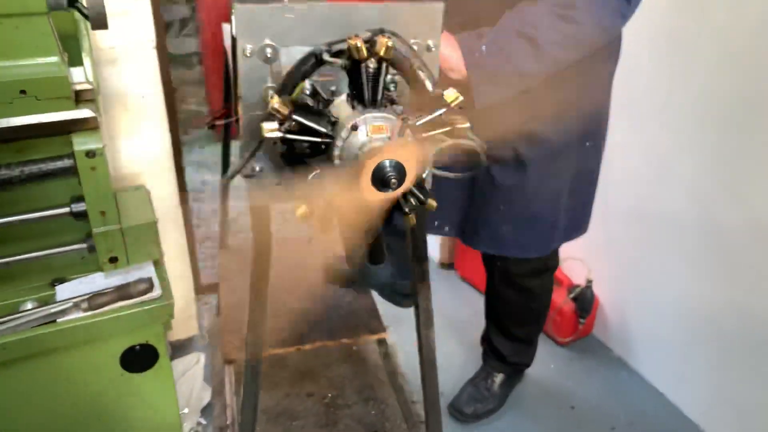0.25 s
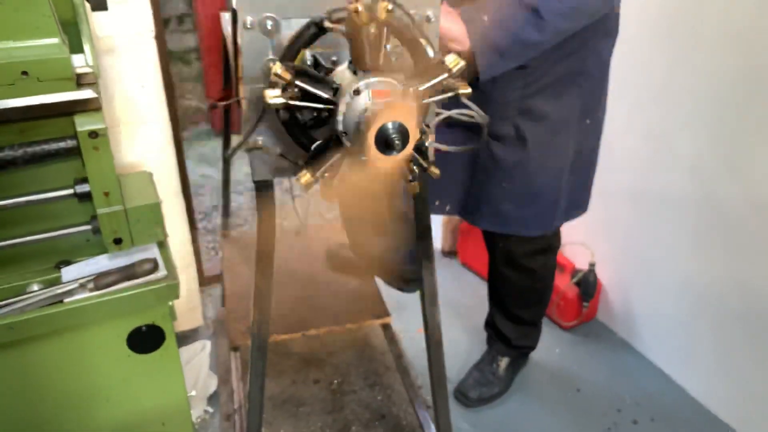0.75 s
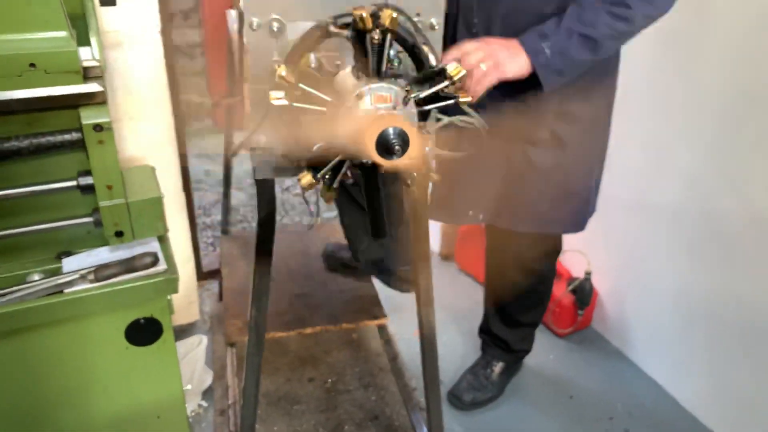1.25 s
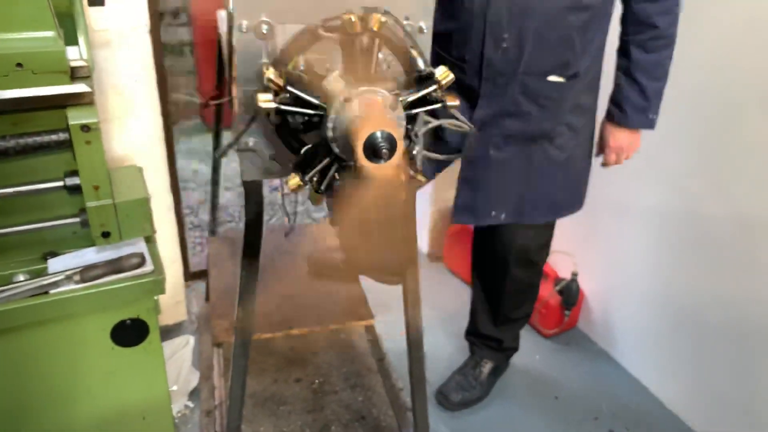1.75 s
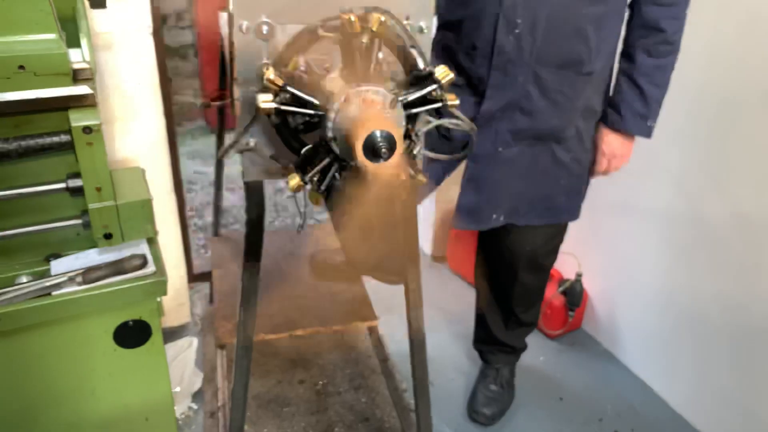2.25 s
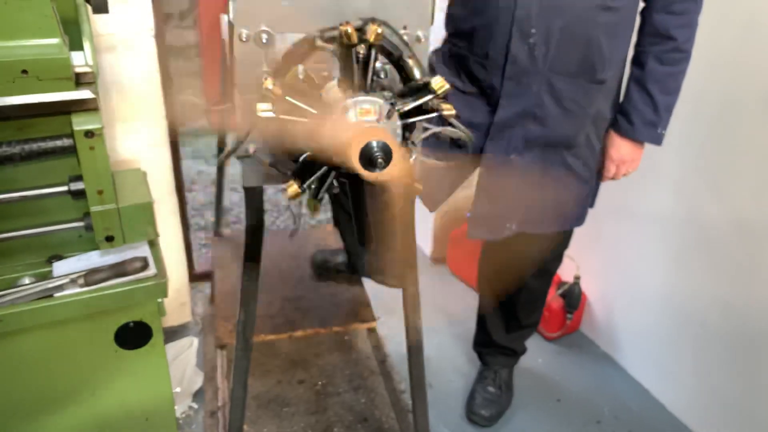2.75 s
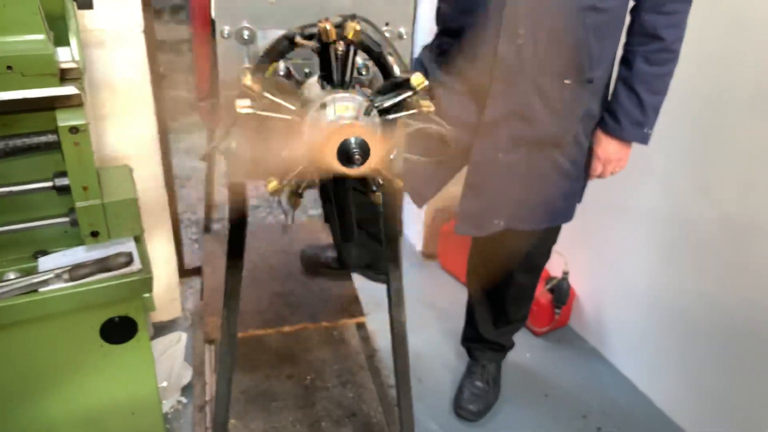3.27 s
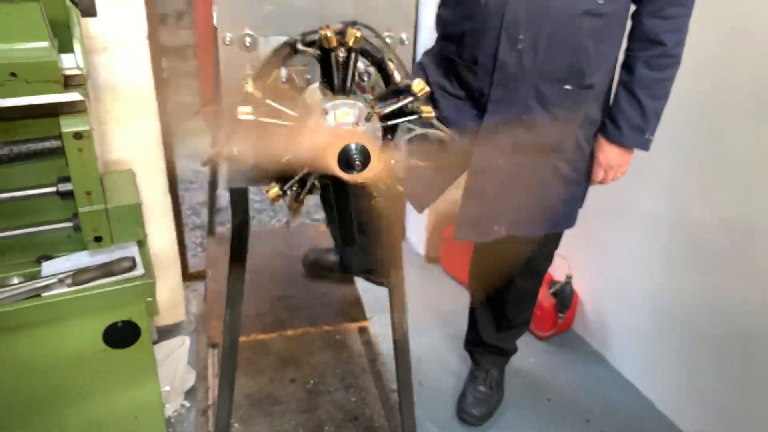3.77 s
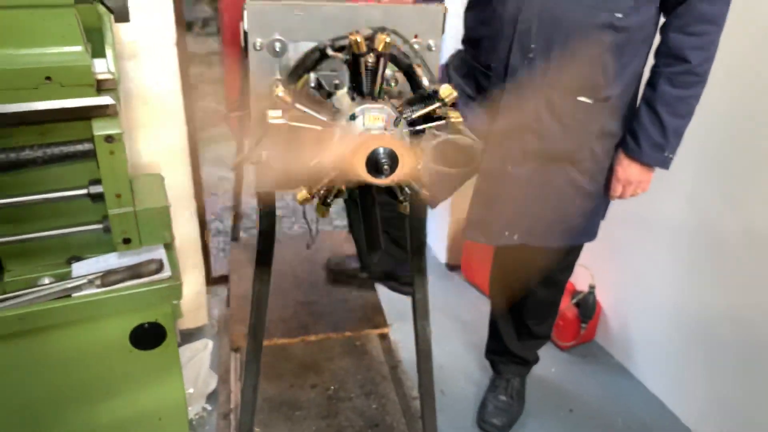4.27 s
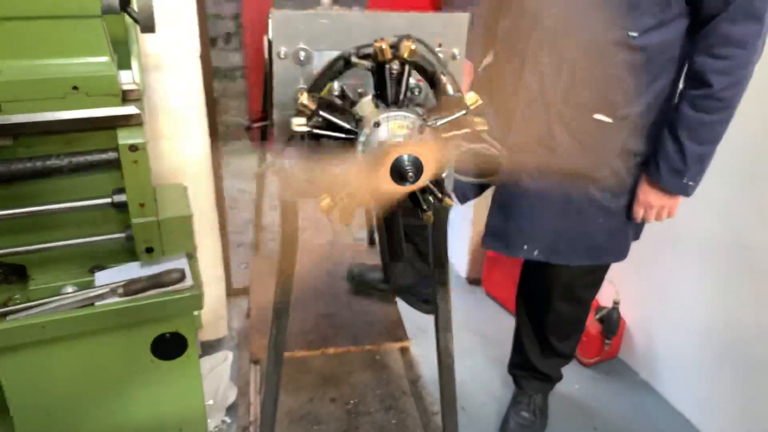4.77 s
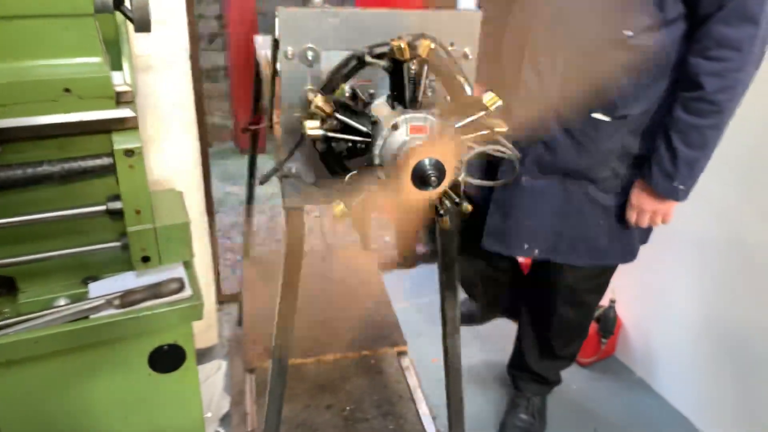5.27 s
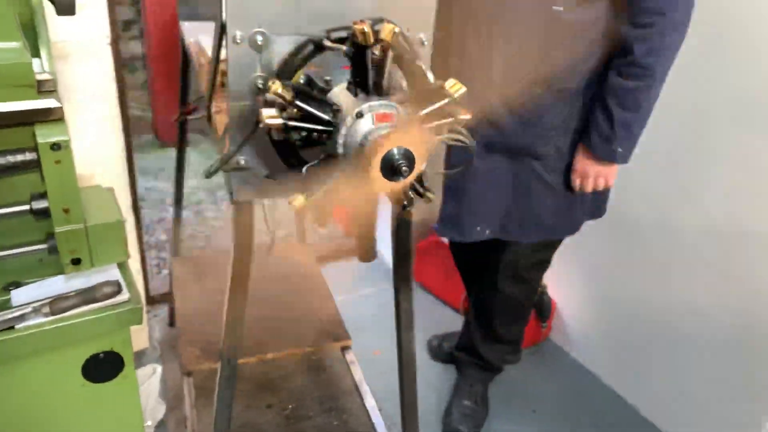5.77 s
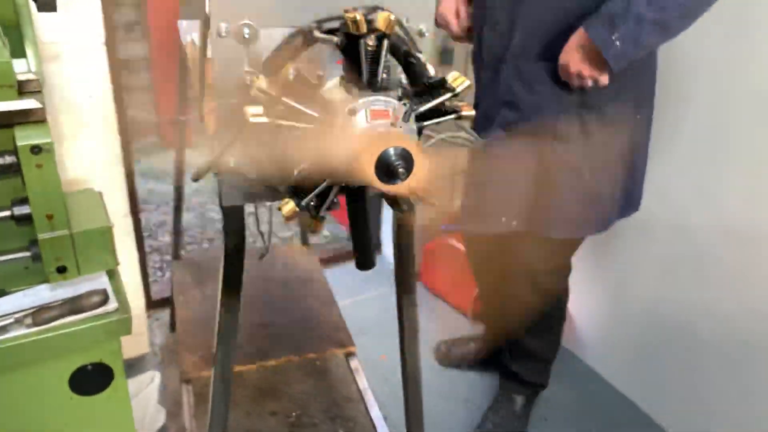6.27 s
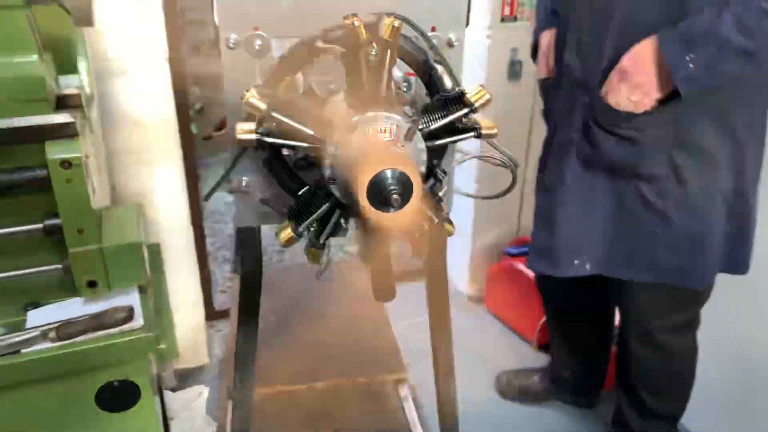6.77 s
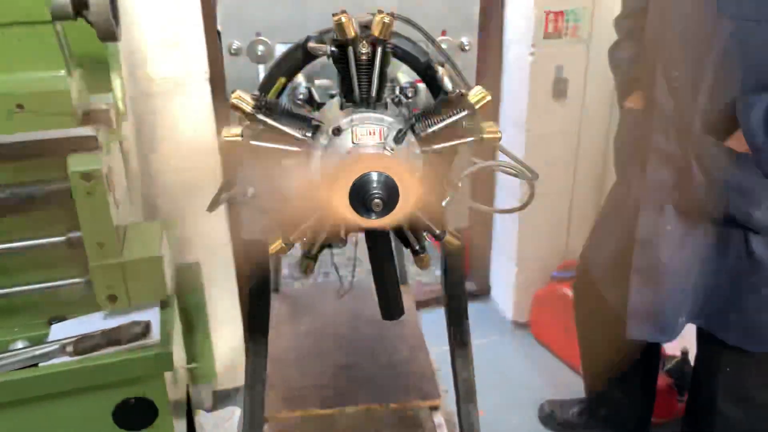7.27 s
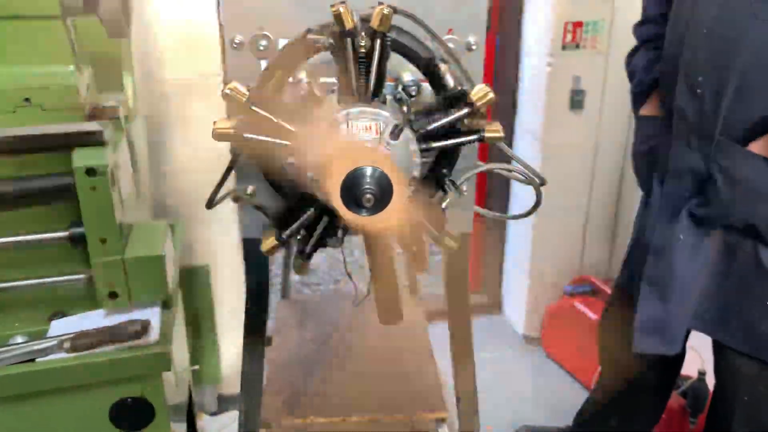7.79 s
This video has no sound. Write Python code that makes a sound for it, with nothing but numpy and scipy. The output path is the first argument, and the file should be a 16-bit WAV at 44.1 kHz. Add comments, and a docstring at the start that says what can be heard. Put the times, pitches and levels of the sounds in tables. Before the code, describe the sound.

A small radial petrol engine is already idling at 0 seconds and keeps running to the end at about 8 seconds, turning a wooden propeller on a workshop stand about a metre from the microphone. The main sound is a rapid, deep exhaust thumping, roughly thirty beats a second, bunched into uneven clusters by frequent missed firings. Each thump comes with a short, ringing metallic knock and a spit of hiss from the pipe. The tiny gaps are filled by valve gear clatter and fluttering propeller wash, with a low throb underneath and sharp, bright ticks scattered throughout. Around 3.3 to 3.7 seconds the engine briefly quickens a little and the low throb swells, then it settles back into the same lumpy idle. The loudness stays about even overall, and the room adds short reflections and a low hum.

```python
"""An uneven, thumping idle: a small radial engine on a workshop stand, a metre from a two-port microphone.
Each cylinder that fires thumps the exhaust pipe, rings the metal and spits hiss from the pipe mouth.
Missed firings leave gaps filled by valve gear clatter and propeller wash.
Blade passes and piston strokes add a low throb."""
import sys
import numpy as np
from scipy import signal
from scipy.fft import rfft, irfft
from scipy.io import wavfile
from scipy.ndimage import uniform_filter1d

SR = 44100
rng = np.random.default_rng(int(sys.argv[2]) if len(sys.argv) > 2 else 0)


def dump_mix(stems):
    """Bounce the given channels to the path in sys.argv[1] as a 16-bit WAV at rate SR."""
    frames = np.atleast_2d(stems).T  # one column per channel
    limited = np.clip(frames, -1, 1)  # hard clip at full scale
    pcm = np.round(limited * 32767).astype(np.int16)
    wavfile.write(sys.argv[1], SR, pcm)


N = 354123

# firings: t/s, thump level/dB, knock level/dB, hiss level/dB
FIRINGS = [(0, -7, -26, -34), (0.0279, -10, -28, -23.5), (0.066, -16, -21.5, -32), (0.0856, -9, -27, -20),
           (0.1043, -7.5, -21.5, -21.5), (0.1584, -12.5, -28, -23.2), (0.1777, -6.5, -27, -28),
           (0.2143, -8, -26.5, -30), (0.2723, -8.5, -25, -20), (0.3106, -10, -28.5, -44),
           (0.3493, -14, -21.5, -19), (0.3678, -7.5, -25.7, -22), (0.3877, -12, -23, -25),
           (0.405, -8.5, -30, -33), (0.4616, -6, -23, -19.5), (0.497, -8.5, -26, -32.9),
           (0.5356, -12.5, -25, -21), (0.5562, -11.5, -26.5, -26.5), (0.595, -10.5, -24.5, -30.1),
           (0.6349, -11, -22.5, -20), (0.6555, -7.5, -26, -24), (0.6743, -8, -21.2, -30),
           (0.6966, -13.5, -32, -35), (0.7511, -8.5, -20.5, -19.5), (0.791, -10.5, -29, -25),
           (0.829, -14, -17.5, -19), (0.849, -9, -31, -24), (0.8854, -14.5, -32, -41),
           (0.9465, -8.5, -21.5, -19.5), (0.9657, -7, -19, -22), (0.991, -9, -32, -42),
           (1.0218, -21, -23, -23), (1.0402, -7, -25.5, -23), (1.078, -17, -28, -45),
           (1.1176, -14, -39, -42), (1.1378, -11, -24.5, -19.5), (1.178, -9.5, -24, -36),
           (1.2173, -11, -20.5, -19.9), (1.2382, -9, -21, -20), (1.2563, -8.5, -23, -24),
           (1.2753, -8.5, -37, -33), (1.33, -10.5, -23, -19.5), (1.37, -11.5, -37, -41),
           (1.4093, -12, -18, -20.5), (1.4292, -10, -26.5, -26), (1.4688, -8.3, -30, -35),
           (1.5331, -9.5, -23, -20), (1.5522, -8, -25, -29), (1.5712, -7, -28, -37), (1.611, -13, -21, -19),
           (1.6306, -9.5, -27.4, -22.5), (1.6687, -14, -26, -39), (1.7304, -8.5, -22, -20),
           (1.772, -10, -32, -51), (1.8154, -15, -23.5, -22), (1.8373, -10, -30, -26.9),
           (1.8575, -10, -20, -23), (1.8767, -8, -33, -43), (1.9188, -12, -19, -27), (1.9395, -8, -28, -25),
           (1.9793, -7.5, -23, -28.8), (2.021, -15.5, -24, -40), (2.0427, -9.5, -23.5, -21),
           (2.0833, -13, -27, -48), (2.1248, -17, -21.5, -19), (2.1457, -8, -24, -24),
           (2.1658, -14, -26, -22), (2.1843, -7, -22, -41), (2.242, -9.5, -20.5, -23.9),
           (2.2824, -14, -33.9, -44), (2.3247, -16, -17.5, -23.5), (2.3464, -12, -27, -27),
           (2.3871, -8.5, -24, -41), (2.4514, -10, -21, -18.5), (2.4715, -9.5, -20.5, -26),
           (2.4912, -13, -33, -49), (2.5313, -12.5, -27, -17), (2.5512, -7.5, -29, -20),
           (2.5909, -12, -27, -28.8), (2.6512, -9, -25, -26.4), (2.671, -15, -26.5, -38),
           (2.691, -10, -29, -43), (2.7332, -17, -21, -21), (2.7551, -11, -23, -22),
           (2.7749, -12, -23, -30), (2.795, -7, -25, -31), (2.8354, -13, -37.0, -47),
           (2.8573, -9.5, -22, -21), (2.899, -20, -23.5, -37.0), (2.9415, -14, -19, -19),
           (2.9617, -8.5, -26, -23.4), (2.981, -11, -21.7, -27), (3.001, -6.8, -26.9, -32),
           (3.0617, -7.5, -23.4, -19), (3.103, -11.5, -27.5, -39), (3.147, -14, -24, -22),
           (3.1688, -9.5, -28.0, -23.5), (3.1885, -10, -23, -28), (3.2091, -8.5, -32, -35),
           (3.251, -19, -21, -20), (3.273, -11, -23, -21.5), (3.2912, -9, -19, -25),
           (3.3111, -6.5, -28, -30), (3.3483, -12, -15.5, -17.3), (3.3657, -9, -24, -22.5),
           (3.3815, -12.7, -20.5, -23), (3.3957, -9, -19.6, -40), (3.427, -12, -26, -34),
           (3.443, -8, -22.9, -22), (3.4729, -6.6, -22, -27), (3.4989, -15, -15, -21),
           (3.5145, -10, -31, -23.0), (3.5429, -12, -28, -32), (3.5883, -10, -24, -28.4),
           (3.6035, -9, -20.5, -29), (3.6231, -13, -31, -34), (3.6703, -7, -21.5, -19),
           (3.7383, -13, -17.5, -18.3), (3.7562, -16, -31, -33), (3.7998, -12.5, -33.9, -39),
           (3.8544, -9.5, -23.5, -20.5), (3.8742, -13.5, -20.5, -26), (3.8939, -9, -32, -27.9),
           (3.9304, -12, -23.5, -23), (3.952, -13, -26, -26.9), (3.9917, -10.5, -30, -43),
           (4.0356, -12.5, -22, -20.9), (4.0572, -7.5, -23, -21.5), (4.077, -12, -24, -31),
           (4.0972, -9, -30, -31), (4.1619, -9.5, -26, -20.5), (4.2032, -9.5, -23, -33),
           (4.2456, -13, -18.5, -17.8), (4.2666, -8, -29, -28), (4.2862, -11, -25, -26),
           (4.305, -14, -47, -44), (4.3701, -9.5, -26.0, -19.5), (4.411, -6.5, -32, -25),
           (4.4525, -18, -17, -20.1), (4.4756, -8.5, -28, -18.5), (4.495, -9.1, -20, -29),
           (4.5141, -14, -32, -44), (4.579, -10, -27, -23.2), (4.624, -9.5, -26, -36),
           (4.6646, -11.5, -26, -15), (4.6847, -7.5, -32, -28), (4.7032, -10, -27, -41),
           (4.7872, -9, -23, -21.5), (4.807, -19, -33, -50), (4.8278, -8.5, -32, -37.0),
           (4.8681, -11, -17.5, -19.9), (4.889, -10, -26, -28), (4.9087, -9, -26.5, -31),
           (4.9299, -11.5, -31, -38), (4.9913, -8.5, -21.5, -21.2), (5.0324, -8, -22.5, -35),
           (5.0726, -14, -20.7, -16), (5.0933, -7.5, -26, -25), (5.1122, -8.5, -25, -29),
           (5.1357, -17, -36, -38), (5.189, -8.5, -21.5, -21.5), (5.231, -8.5, -27, -23),
           (5.2715, -11, -31.2, -32), (5.2923, -10, -25, -19.5), (5.376, -19, -16.5, -22.5),
           (5.3971, -8, -34, -18.5), (5.4166, -9, -21, -22), (5.4358, -7.5, -31, -41),
           (5.497, -7.5, -20.5, -17.5), (5.5376, -9, -32, -34), (5.5791, -14, -18.5, -20),
           (5.5989, -7.5, -32, -20), (5.6384, -9, -37, -42), (5.706, -9, -20.5, -26),
           (5.7262, -8, -24, -25), (5.7467, -8, -30, -33), (5.7874, -8.5, -21.5, -19),
           (5.8084, -8.5, -25, -23.9), (5.8489, -10.5, -32, -33), (5.8926, -18.5, -47, -28),
           (5.9152, -8, -20, -21), (5.935, -9, -30, -33), (5.9553, -6.5, -23.5, -30),
           (5.9964, -11, -20, -21.5), (6.0175, -9.5, -33, -25), (6.0581, -10.5, -29, -41),
           (6.128, -8.5, -24, -24.5), (6.1474, -10, -20.2, -30), (6.1691, -7.1, -26.5, -32),
           (6.2139, -10.6, -23.5, -17), (6.2348, -6.5, -28, -26), (6.2755, -11, -27, -45),
           (6.3454, -9, -33, -17), (6.3664, -12, -18.5, -32), (6.3871, -7.5, -38, -34),
           (6.4309, -11, -20.5, -20), (6.452, -8.5, -24.5, -22), (6.4954, -15, -26.9, -31),
           (6.566, -6.5, -23, -20), (6.5868, -14, -42, -38), (6.61, -7.7, -25, -25.7),
           (6.6546, -12, -18, -18.4), (6.676, -6.5, -28, -24), (6.6956, -8, -18.5, -37),
           (6.716, -11, -30, -37), (6.7812, -11.5, -27, -19), (6.8235, -7, -25.5, -27),
           (6.8672, -12, -22, -17.5), (6.8892, -10.5, -39, -19), (6.9094, -9.5, -22.5, -36),
           (6.9296, -12, -25, -38), (6.9961, -7, -26, -20), (7.0397, -7, -25, -27),
           (7.083, -13, -25, -13.5), (7.1037, -7.5, -25.6, -29), (7.123, -19, -31, -31),
           (7.1438, -12.5, -27, -33), (7.2084, -6, -25, -18.7), (7.229, -11, -28, -33),
           (7.2503, -7, -23.5, -28), (7.293, -15, -27, -18.5), (7.3146, -7.5, -24.5, -23),
           (7.3558, -12, -30, -39), (7.4214, -7, -26, -20), (7.4419, -13, -21, -22.5),
           (7.4629, -7, -37, -34), (7.5016, -11, -19, -17), (7.5209, -7, -40, -19.5),
           (7.5428, -12, -31, -43), (7.5642, -11.5, -31.8, -35.8), (7.6233, -8.5, -25.2, -19.7),
           (7.6645, -6.5, -27, -26.9), (7.7065, -15, -23.5, -25.9), (7.73, -6, -34, -20.5),
           (7.75, -6.4, -21, -29), (7.7726, -11, -42, -31), (7.8164, -11.8, -28, -38),
           (7.8367, -8, -27, -20), (7.8538, -15, -45, -41), (7.8796, -6.5, -27.5, -26),
           (7.9229, -12, -19.5, -19), (7.9443, -7, -37, -21), (7.9639, -14.3, -47, -39),
           (7.9861, -14, -27.3, -37)]
# pipe and workshop modes: f/Hz, decay/s, level/dB
LOW_MODES = [(67, 0.64, 22), (104.5, 0.35, 3.5), (142.2, 0.28, 0.5), (186.4, 0.33, -0.5), (212, 0.38, -35),
             (267.4, 0.11, 1)]
# engine and stand modes: f/Hz, width/Hz, level/dB for each of cylinders 1, 2, 4, 5
METAL_MODES = [(378, 68, -4.5, -0.5, -12, 4), (646, 23, 6.5, 4.5, 0, 6.5),
               (694.7, 21.7, 7.5, -5.5, 9, 13.5), (761.3, 27, 11, -34, -1, 7), (1028, 75, 8, 6, 3, -11.5),
               (1215.7, 13, -16, -5, 7.5, 8), (1635, 44, 7.5, 12.5, 6, 16.5), (1918, 55, 11, 12.5, 5, 1),
               (2094, 39, -6, 17.5, 7, 6.5), (2623, 17, 8, 12, 6, -29.5), (2983, 20, 9, 4.5, 3.5, -20),
               (4040, 54, 9, 18.5, 14, 2), (4460, 20, 20, 5, -17, -23), (4873, 30, -60, 4, -2, 6.5)]
# crank position, five cylinders in turn per cycle: t/s, engine cycles done
CRANK = [(0, 0), (.536, 5.6), (.99, 10.2), (1.369, 14.2), (1.771, 18.2), (2.282, 23.2), (2.691, 27.2),
         (3.273, 32.8), (3.366, 33.85), (3.544, 36.2), (3.67, 37.8), (3.757, 38.8), (3.951, 40.8),
         (4.665, 47.6), (5.536, 56.2), (6.058, 61.2), (6.676, 66.8), (7.084, 70.6), (7.664, 76.2),
         (8.04, 79.7)]


def gain_of(db):
    """Decibels to gain."""
    return 10 ** (np.asarray(db) / 20)


def curve_at(points, hz, column=1):
    """Table column interpolated over log frequency."""
    table = np.transpose(points)
    return np.interp(np.log(hz + 1), np.log(table[0] + 1), table[column])


def coloured(x, spectrum):
    """Filter by a spectrum; white noise keeps its power."""
    gain = gain_of(curve_at(spectrum, np.fft.rfftfreq(N, 1 / SR)))
    return irfft(rfft(x) * gain / np.sqrt(np.mean(gain ** 2)), N)


def at_firings(level_db, shape):
    """The shape repeated at every firing, scaled by its level."""
    onsets = np.round(np.array(FIRINGS)[:, 0] * SR).astype(int)
    impulses = np.zeros(N)
    np.add.at(impulses, onsets, gain_of(level_db))
    return signal.oaconvolve(impulses, shape)[:N]


def ring(x, hz, width_hz):
    """Resonance, unity gain at centre."""
    r = np.exp(-np.pi * width_hz / SR)
    return 2 * signal.lfilter([1 - r], [1, -r * np.exp(2j * np.pi * hz / SR)], x).real


def wander(span_samples):
    """Smoothed noise, unit variance."""
    return uniform_filter1d(rng.standard_normal(N), span_samples) * np.sqrt(span_samples)


def facing_db(times_s):
    """Level change per metal mode: some face the microphone as it drifts round the engine."""
    # t/s, level/dB for each facing mode
    drift = [(0, 4.5, 3, -6, -5.5, 6), (1.2, 2, 0.5, 0.5, -3.5, -11), (2.8, 2.5, -3.5, -2, -5.5, 4),
             (4.4, 2.5, -2, -1, 1.5, -3), (5.3, 1, -6, 1.5, -1.5, 3), (6.2, 6.5, -9, 1, 0, -2),
             (6.8, 6, 0.5, -3, -4.5, 9), (7.4, 5.5, 2.5, -7, -1.5, 16.5), (8, 2, 3.5, 3.5, 0, -1)]
    # row indices into METAL_MODES
    facing_modes = [0, 2, 5, 6, 13]
    knots_s, *levels_db = np.transpose(drift)
    change_db = np.zeros((len(METAL_MODES), len(times_s)))
    change_db[facing_modes] = [np.interp(times_s, knots_s, db) for db in levels_db]
    return change_db


def exhaust_thumps():
    """A gas slug swells in the pipe, dies and leaves the low modes humming. Rows: direct, off the walls."""
    pipe_hz, front_hz, peak_s, wall_t60_s = 182.6, 385, 0.00918, 0.13
    t = np.arange(SR // 2) / SR
    swell = t / peak_s * np.exp(1 - t / peak_s)
    thump = swell ** 3 * np.cos(2 * np.pi * pipe_hz * (t - peak_s))
    # the slug's steep front adds a short tone near the octave
    thump += gain_of(-23.5) * swell ** 2.74 * np.cos(2 * np.pi * front_hz * (t - peak_s))
    thump += sum(gain_of(db) * ring(thump, hz, 1.4 / decay_s) for hz, decay_s, db in LOW_MODES)
    direct = at_firings(np.array(FIRINGS)[:, 1], thump)
    walls = rng.standard_normal(SR // 4) * gain_of(-60 * t[:SR // 4] / wall_t60_s)
    reflected = signal.oaconvolve(direct, walls / np.linalg.norm(walls))[:N]
    return np.array([direct, reflected])


def metal_knocks():
    """A noise burst per firing; cylinder, facing and chance set how strongly each mode rings."""
    # broadband knock: f/Hz, level/dB
    knock_spectrum = [(280, -28), (400, -10.5), (700, -1), (950, -5), (1440, 0), (2000, 5.5), (2800, -4.5),
                      (4500, -22.5), (8000, -5.5)]
    rise_s, decay_s, tail_s = 0.0014, 0.0078, 0.058
    t = np.arange(3000) / SR
    firing_s, _, knock_db, jet_db = np.transpose(FIRINGS)
    cylinder = np.round(5 * np.interp(firing_s, *np.transpose(CRANK))).astype(int) % 5
    column = np.array([0, 1, 1, 2, 3])[cylinder]  # the third rarely fires; it shares the second's levels
    burst = (1 - np.exp(-t / rise_s)) * (np.exp(-t / decay_s) + 0.1 * np.exp(-t / tail_s))
    broadband = coloured(at_firings(knock_db, burst) * rng.standard_normal((2, N)), knock_spectrum)
    offsets_db = 2.2 * rng.standard_normal((len(FIRINGS), len(METAL_MODES))).T + facing_db(firing_s)
    noise = rng.standard_normal((2, N))
    ringing = 0
    for (hz, width_hz, *cylinder_db), offset_db in zip(METAL_MODES, offsets_db):
        force_db = knock_db if hz < 3700 else (knock_db + jet_db) / 2  # the jet also shakes high modes
        width_hz = max(width_hz, hz / 55)  # struck metal loses treble fast
        blows = at_firings(force_db + np.array(cylinder_db)[column] + offset_db, burst)
        ringing += ring(blows * noise, hz, width_hz) / np.sqrt(width_hz / SR)
    return gain_of(2.0) * broadband + gain_of(-17.5) * ringing


def jet_hiss():
    """The pipe mouth spits two puffs as the pressure wave bounces; each firing has its own colour."""
    # jet noise: f/Hz, level/dB
    jet_spectrum = [(1500, -38.5), (3000, -0.5), (4600, 2), (5500, 0), (6500, -6), (8300, 8), (10000, -6),
                    (12500, 5), (15500, -19.5)]
    edges_hz = [0, 4300, 5600, 7200, 10500, SR]
    rise_s, tail_s = 0.001, 0.032
    t = np.arange(3000) / SR
    jet_db = np.array(FIRINGS)[:, 3]
    first_puff = np.exp(-0.5 * ((t - 0.0027) / 0.00083) ** 2)
    second_puff = 0.83 * np.exp(-0.5 * ((t - 0.0066) / 0.0019) ** 2)
    tail = 0.5 * (1 - np.exp(-t / rise_s)) * np.exp(-t / tail_s)
    envelope = first_puff + second_puff + tail
    turbulence = gain_of(1.06 * wander(30))
    noise_bins = rfft(coloured(rng.standard_normal((2, N)), jet_spectrum))
    hz = np.fft.rfftfreq(N, 1 / SR)
    offsets_db = 2.5 * rng.standard_normal((len(FIRINGS), 5)).T
    hiss = 0
    for low_hz, high_hz, offset_db in zip(edges_hz, edges_hz[1:], offsets_db):
        band = irfft(noise_bins * (hz > low_hz) * (hz <= high_hz), N)
        hiss += at_firings(jet_db + offset_db, envelope) * turbulence * band
    return gain_of(1.0) * hiss


def clatter_and_wash():
    """Valve gear and propeller wash: flickering noise, partly through the metal."""
    # clatter and wash: f/Hz, level/dB
    clatter_spectrum = [(20, -17), (45, 11), (110, 9.5), (190, 16.5), (250, 3.5), (315, -3), (400, 0),
                        (700, -2.5), (1440, -9.5), (2060, -0.5), (3400, 0), (4500, 1), (6500, -7),
                        (8300, -3.5), (12500, -7), (15500, -6)]
    flicker = gain_of(2.3 * wander(300))
    noise = flicker * rng.standard_normal((2, N))
    facing_gains = gain_of(facing_db(np.arange(N) / SR))
    ringing = 0
    for (hz, width_hz, *cylinder_db), facing in zip(METAL_MODES, facing_gains):
        mode = ring(noise, hz, width_hz) / np.sqrt(width_hz / SR)
        ringing += facing * gain_of(np.mean(cylinder_db)) * mode
    return gain_of(-24) * (coloured(noise, clatter_spectrum) + gain_of(-30.5) * ringing)


def valve_ticks():
    """Short bright bursts from the valve gear: faint ones at random, sharp ones at set times."""
    # sharp ticks: t/s, level/dB
    sharp_ticks = [(0.231, -7), (0.422, -11), (0.537, -25), (0.613, -11), (0.71, -13), (0.809, -6),
                   (0.972, -13), (1.196, -12), (1.291, -18), (1.59, -8), (2.364, -13), (2.609, -7),
                   (2.813, -6), (3.123, -13), (3.328, -5), (3.558, -8), (3.692, -17), (3.72, -15),
                   (3.782, -13), (4.388, -16), (4.91, -22), (5.119, -19), (5.249, -7), (5.453, -6),
                   (6.515, -14), (6.616, -18), (6.639, -9), (6.851, -18), (7.17, -16), (7.27, -19),
                   (7.586, -15), (7.684, -10), (7.88, -21), (7.898, -9), (8.013, -10)]
    # tick colour: f/Hz, level/dB
    tick_spectrum = [(2000, -25), (5000, -13), (8500, -19), (12500, 11), (15500, -0.5)]
    rate_per_s, decay_s = 190, 0.00076
    faint_db = -35 + 5.1 * np.minimum(rng.exponential(1, N), 3)
    impulses = gain_of(faint_db) * (rng.random(N) < rate_per_s / SR)
    sharp_s, sharp_db = np.transpose(sharp_ticks)
    impulses[np.round(sharp_s * SR).astype(int)] = gain_of(sharp_db + 0.5)
    envelope = signal.oaconvolve(impulses, np.exp(-np.arange(400) / SR / decay_s))[:N]
    return coloured(envelope * rng.standard_normal((2, N)), tick_spectrum)


def shaft_throb():
    """Tones locked to the shaft, wavering in level; a burst of speed meets the lowest room mode."""
    # blade passes, then piston strokes: beats per engine cycle, level/dB
    orders = [(4, -39), (5, -39)]
    cycles = np.interp(np.arange(N) / SR, *np.transpose(CRANK))
    cycles = uniform_filter1d(cycles, SR // 8, mode="nearest")
    tones = 0
    for beats, db in orders:
        amplitude = np.sqrt(2) * gain_of(db + 1.8 * wander(9000))
        tones += amplitude * np.sin(2 * np.pi * beats * cycles)
    room_hz = LOW_MODES[0][0]
    boom = ring(ring(tones, room_hz, width_hz=6), room_hz, width_hz=6)
    return tones + gain_of(11) * boom


def scene():
    """Rows: the sound common to both ports, and the part they do not share."""
    low_end = exhaust_thumps() + shaft_throb() * [[1], [0.5]]
    return low_end + metal_knocks() + jet_hiss() + clatter_and_wash() + valve_ticks()


def record(dry):
    """Two ports share part of the sound, phase-shifted; peaks round off; a low-pass follows."""
    # port pair: f/Hz, coherence/0-1, left phase lead/rad, left minus right level/dB
    ports = [(30, .95, 0, 2), (70, .98, .05, 1.3), (200, .985, .19, .9), (500, .96, .3, .5),
             (1000, .9, .6, -.3), (2000, .75, .5, -.8), (2900, .7, -1.5, -.4), (4300, .45, -3.3, .4),
             (5300, .4, -4.9, .6), (6000, .15, -6.3, .8), (6800, .4, -7.7, 1), (7500, .3, -9.4, 2),
             (8300, .7, -11.9, 2.5), (10500, .9, -9.43, 1.5), (12300, .97, -6.75, 0), (13100, .97, -6, 0),
             (14500, .97, -3.5, 0), (15200, .99, -3.14, 0)]
    cutoff_hz = 15790
    hz = np.fft.rfftfreq(N, 1 / SR)
    coherence, lead_rad, balance_db = (curve_at(ports, hz, column) for column in (1, 2, 3))
    common, unshared = rfft(dry)
    mix_rad = np.arccos(np.clip(coherence, 0, 1)) / 2
    skew = gain_of(balance_db / 2) * np.exp(0.5j * lead_rad)
    left = (np.cos(mix_rad) * common + np.sin(mix_rad) * unshared) * skew
    right = (np.cos(mix_rad) * common - np.sin(mix_rad) * unshared) / skew
    saturated = 1.36 * np.tanh(irfft(np.array([left, right]), N) / 1.246)
    lowpass = signal.firwin(1023, cutoff_hz, window=("kaiser", 9), fs=SR)
    return np.clip(signal.oaconvolve(saturated, lowpass[None], "same"), -1, 1)


dry = scene()
out = record(dry)
dump_mix(out)
```